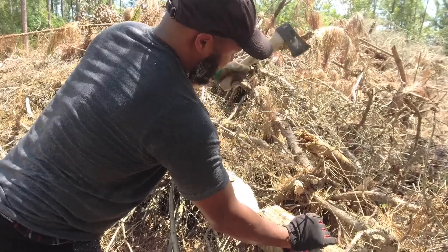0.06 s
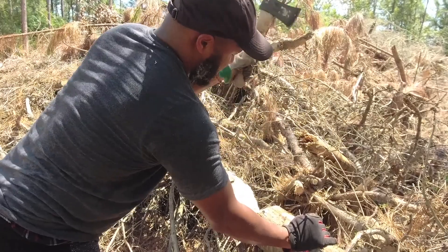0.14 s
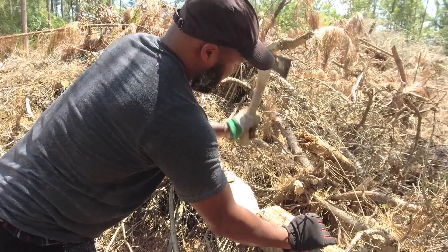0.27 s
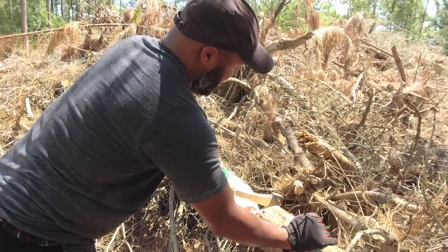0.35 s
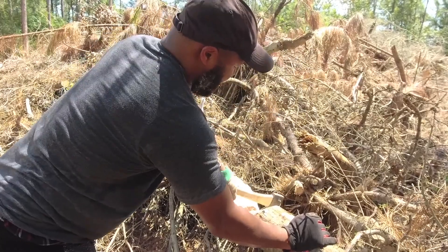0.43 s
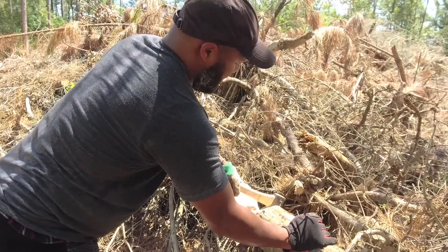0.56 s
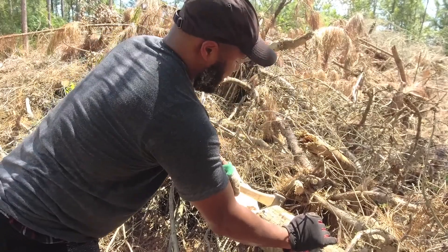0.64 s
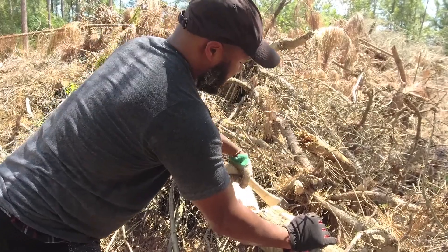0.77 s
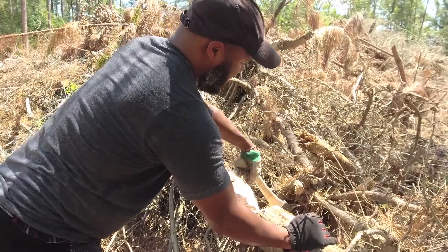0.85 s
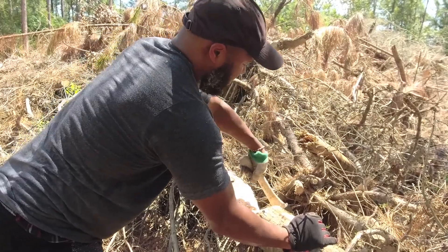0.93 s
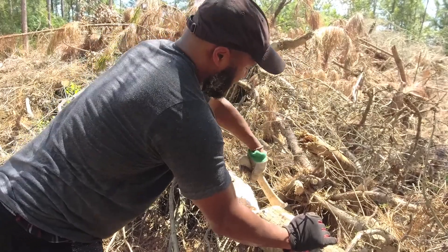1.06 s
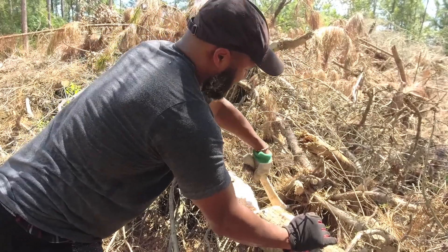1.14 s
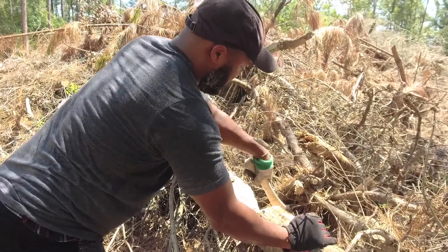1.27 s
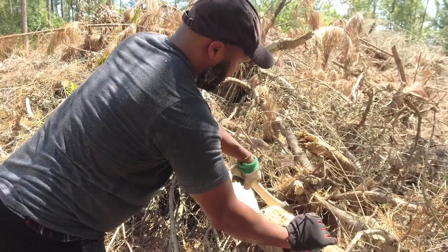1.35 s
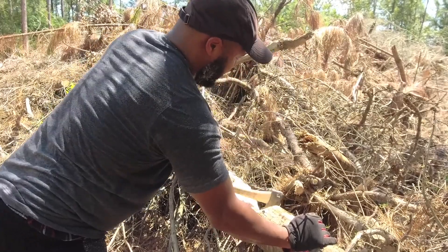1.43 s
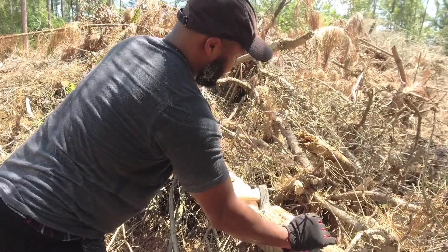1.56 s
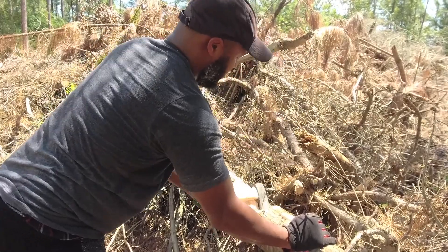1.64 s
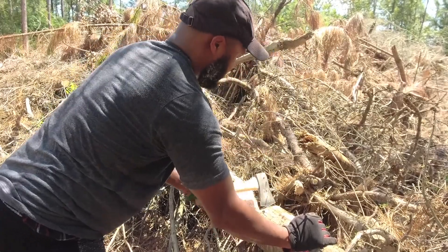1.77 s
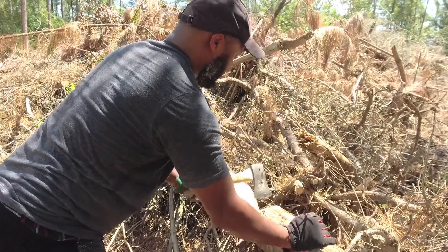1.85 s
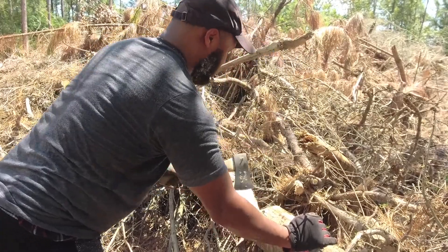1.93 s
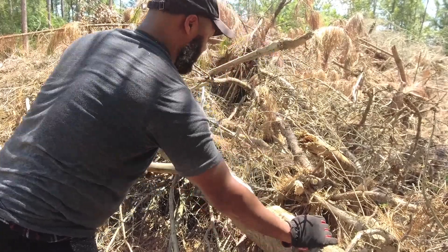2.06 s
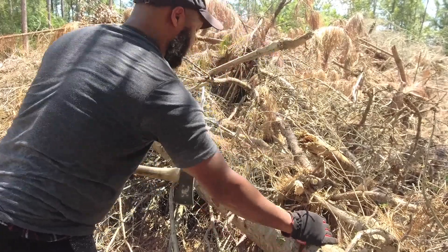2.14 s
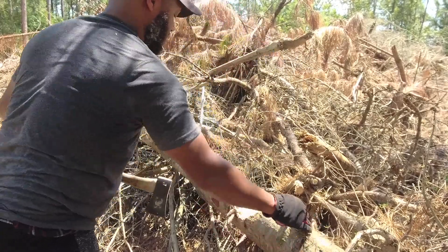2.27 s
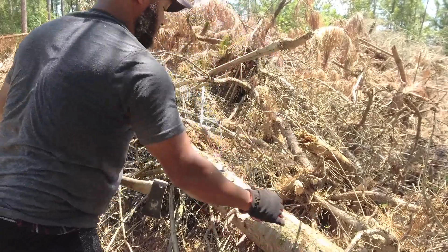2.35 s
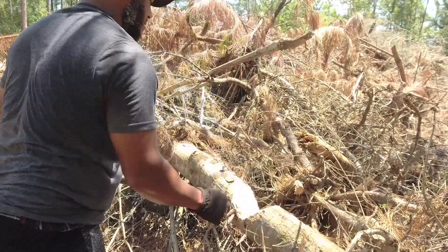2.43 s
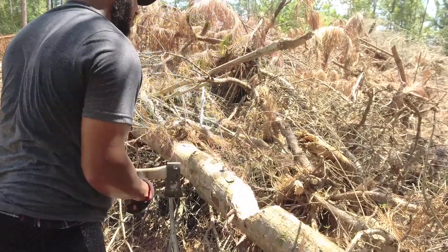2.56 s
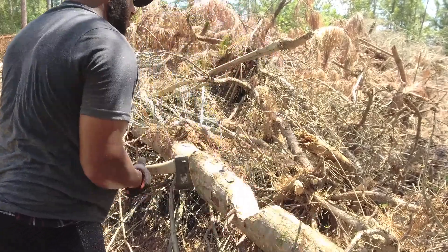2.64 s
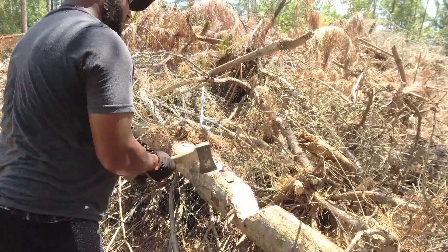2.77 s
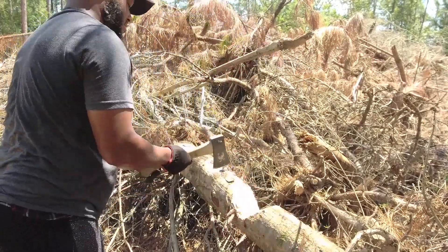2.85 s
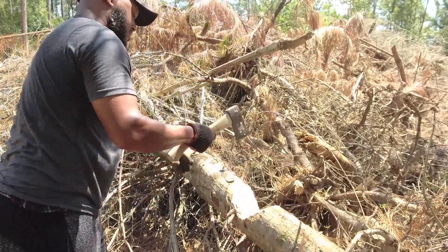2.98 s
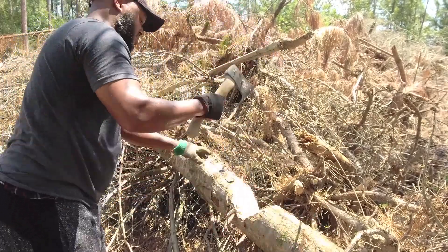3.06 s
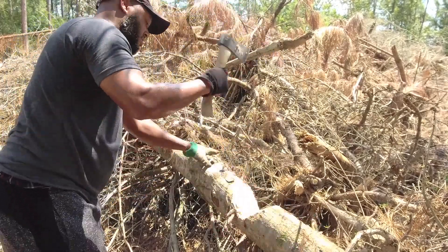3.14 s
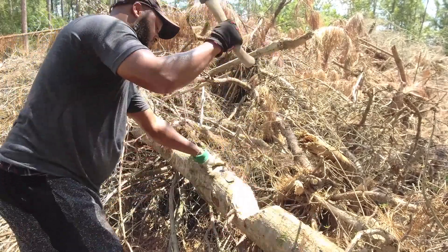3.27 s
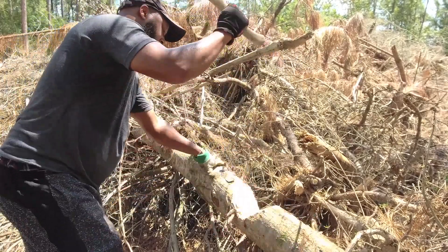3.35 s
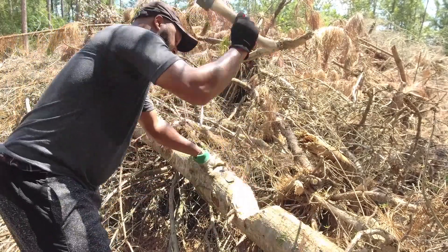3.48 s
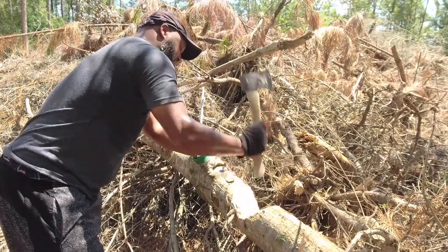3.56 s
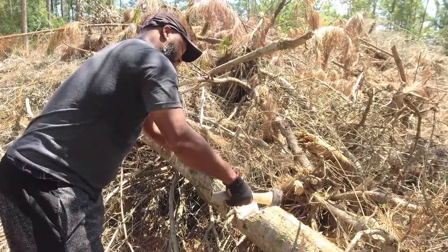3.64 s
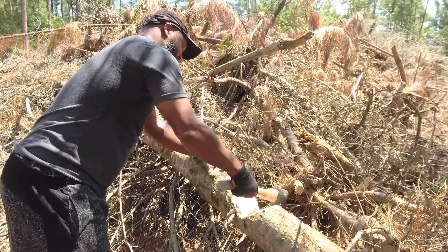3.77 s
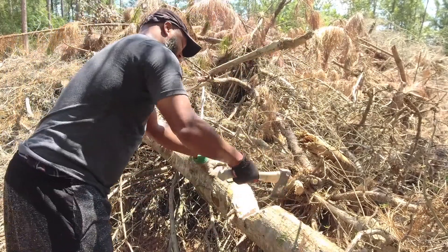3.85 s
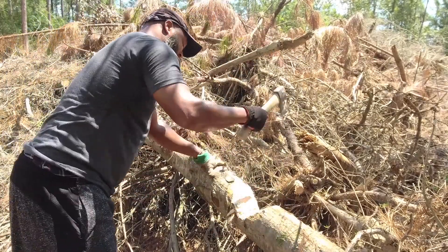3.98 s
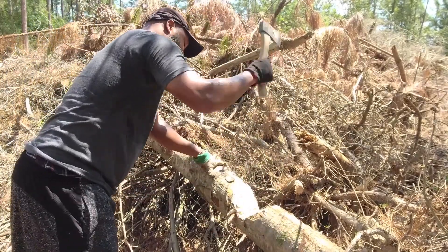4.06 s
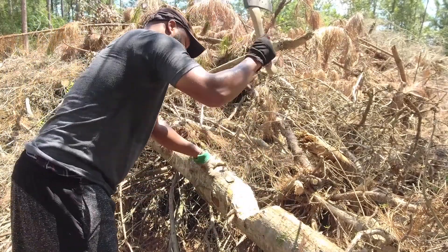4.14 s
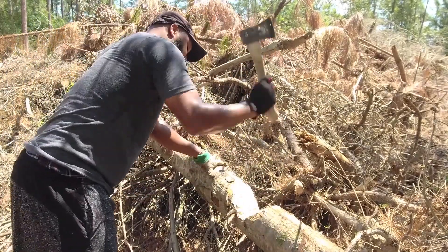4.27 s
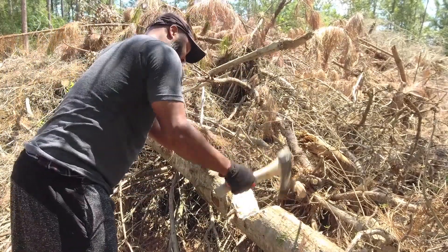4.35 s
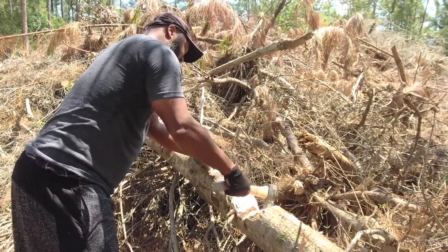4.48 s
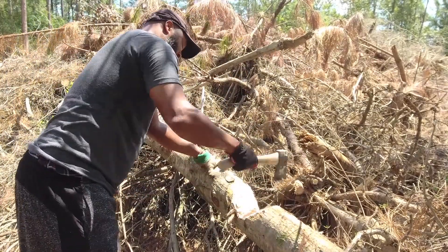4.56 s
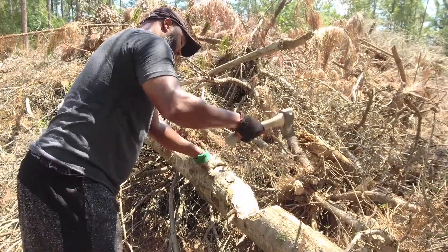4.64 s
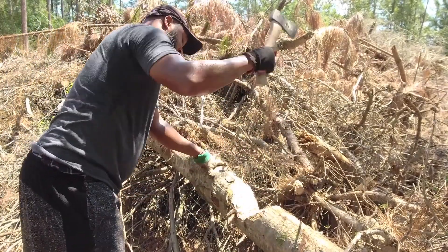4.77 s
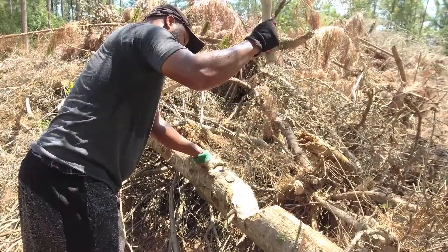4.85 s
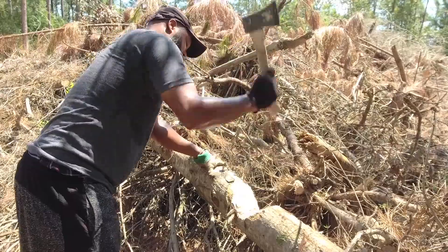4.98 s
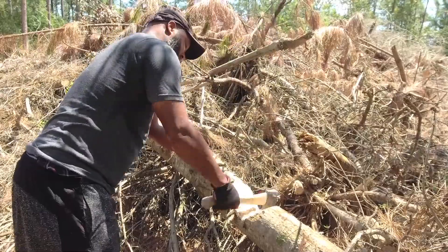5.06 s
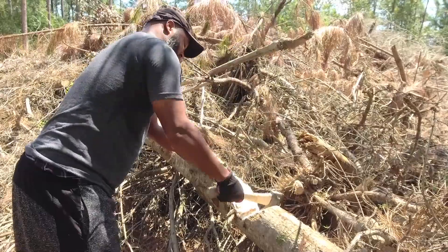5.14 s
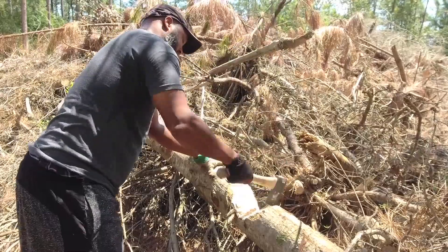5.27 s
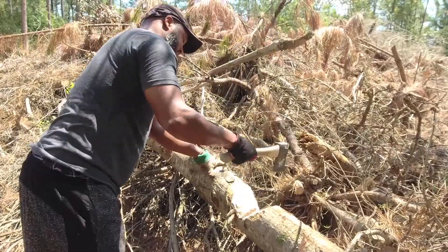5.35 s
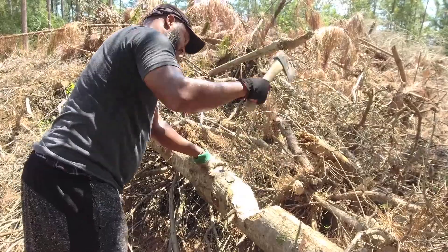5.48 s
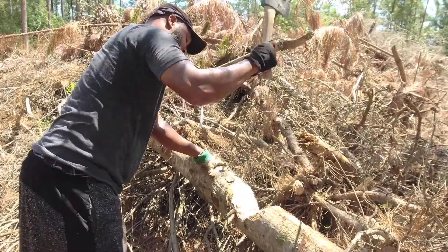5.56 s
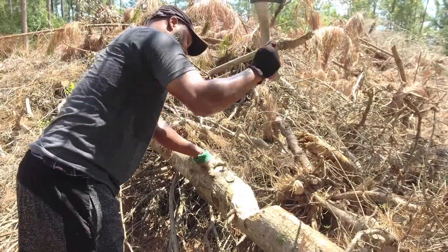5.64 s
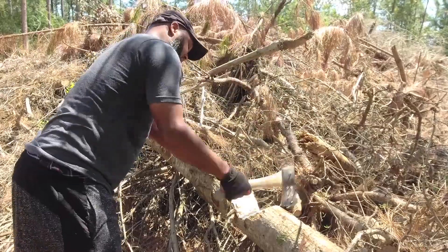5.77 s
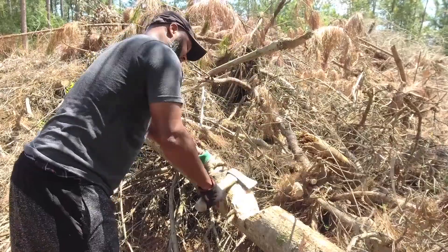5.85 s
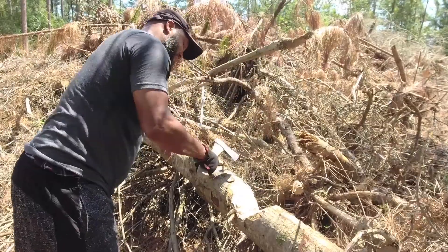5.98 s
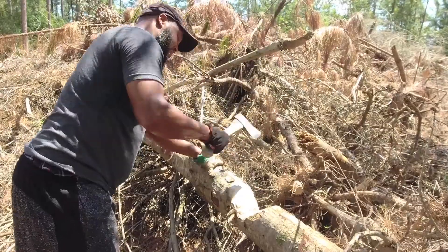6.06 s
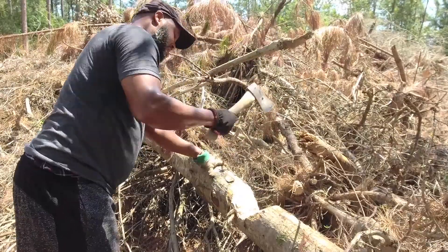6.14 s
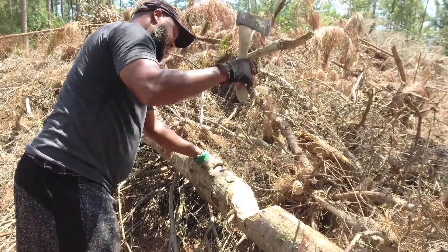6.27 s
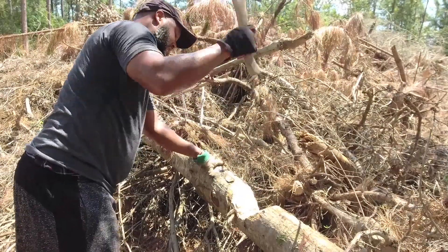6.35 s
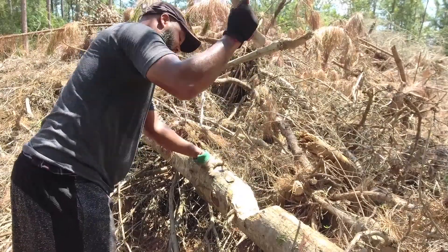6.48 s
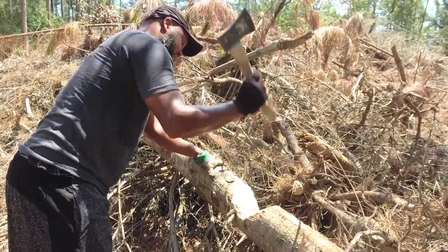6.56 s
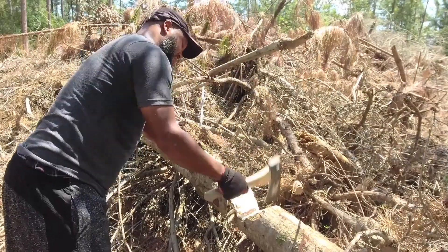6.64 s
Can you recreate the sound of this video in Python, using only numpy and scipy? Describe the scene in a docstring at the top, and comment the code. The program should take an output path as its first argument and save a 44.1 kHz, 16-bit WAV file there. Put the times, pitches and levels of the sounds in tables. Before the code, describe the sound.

Close up outdoors, a hatchet cracks into a dry log, woody and steely, so loud it distorts. The stuck blade creaks loose in tiny ringing slips, cloth chafes softly, then feet crunch dry litter and twigs snap. Five more chops follow at steady intervals, one skidding along the bark. Chips patter down, short echoes return from brush and trees, and cicadas throb faintly to the right over low rumble.

```python
"""Chopping a dry log outdoors

A hatchet chops a dry log beside a pile of brush: bursts of noise and dying tones, cut off at full scale.
The blade sticks and is levered free with quick slips that ring the wood, feet crunch as clumped grains,
then five more swings follow; one skids along the bark with a rub of noise.
Cicadas, a throbbing comb of harmonics with a rasp, swell and fade to the right over a low noise rumble."""
import sys
import numpy as np
from scipy import signal
from scipy.fft import rfft, irfft
from scipy.io import wavfile
from scipy.ndimage import uniform_filter1d

SR = 44100
rng = np.random.default_rng(int(sys.argv[2]) if len(sys.argv) > 2 else 0)


def unload_audio(sound):
    """Save the sound as a 16-bit wav file, at the path given as the first command line argument."""
    columns = np.transpose(np.atleast_2d(sound))
    # keep every value between -1 and 1, then stretch to whole-number steps
    steps = np.round(np.clip(columns, -1, 1) * 32767)
    wavfile.write(sys.argv[1], SR, steps.astype(np.int16))


N = 295911

# All levels are relative: they are combined with other levels further on.
# blade meets wood: start_s, crack_db, low_steel_hz, low_steel_db, high_steel_hz, high_steel_db,
# steel_t60_s (time to fall 60 dB), grit (0-1), clack_db, clack_hz, knock_db, knock_hz,
# log_body_db, log_thud_db, high_log_modes_db
BLOWS = [(0.3516, -8.5, 4735, -3.5, 6050, -0.5, 0.0087, 0.71, -2.5, 950, -18.5, 501.5, -1.5, 6, -18.5),
         (3.6361, -2.5, 3840, -8.5, 6900, -14, 0.011, 0.98, -7.5, 1550, -7, 693, -1.5, 2.5, 0.5),
         (4.3546, -17, 3800, -12.5, 7040, -6.5, 0.033, 0.57, -27.5, 1394, -28.5, 600, -21.5, -19, -19.5),
         (4.3698, -5.5, 4424, 1.5, 5430, -1, 0.0098, 0.77, -2, 1470, -24, 479, -4.5, -3.5, -0.5),
         (5.0507, -27, 3720, -27, 7020, -27.5, 0.06, 0.76, -20, 2340, -43, 700, -28.5, -29.5, -23),
         (5.0647, -5, 4330, -5, 5720, -0.5, 0.012, 0.65, -4, 1600, -15.5, 730, -0.5, -1.5, 0.5),
         (5.7814, -11.5, 4160, -5.5, 6880, -9.5, 0.023, .55, -39, 1560, -30.5, 602, -22, -26.5, -13),
         (5.8451, -30, 2530, -11.5, 3900, -16, 0.012, 0.57, 3.5, 1272, -4.5, 620, 6.5, -23.5, -7),
         (5.877, -40.5, 2446, -33, 4150, -35, 0.018, 0.85, -19, 1356, -24, 604, -13, -36.5, -23.5),
         (6.6685, -12.5, 4524, -1.5, 7450, -7, 0.012, 0.62, -10, 1476, -9.5, 630, 2.5, 7, -10)]
# ringing tones of the log, before each blow shifts them a little: pitch_hz, level_db, t60_s
LOG_MODES = [(107, -34, 0.05), (144, -24.5, 0.06), (239.4, -30.5, 0.087), (323, -26.5, 0.045),
             (470.4, -28, 0.04), (570, -22.5, 0.038), (690, -20, 0.035), (820, -17.5, 0.035),
             (916, -27, 0.019), (1394, -12.5, 0.041), (1720, -19, 0.032), (1806, -15, 0.005),
             (2796, -15.5, 0.033)]
# colour of splitting fibres: pitch_hz, level_db (per Hz)
CRACK_COLOUR = [(100, -13.5), (500, 0.5), (1500, -6), (2300, -2.5), (4000, -4.5), (7000, -3), (10500, -4.5),
                (13000, -17), (16000, -21)]
# the log shudders on its bed of brush: pitch_hz, level_db (per Hz)
BED_COLOUR = [(60, -8), (150, 1.5), (220, -5), (350, -4), (700, -4), (1100, -12), (2500, -30),
              (8000, -60.5)]
# the wedged blade slips in the cut: start_s, length_s, level_db, first_slips_per_s, last_slips_per_s,
# brightness_db (per octave)
CREAKS = [(1.169, 0.1, -42, 118, 48, 14), (1.349, 0.0072, -33.5, 120, 120, 4.5),
          (1.361, 0.044, -41.5, 270, 350, 1), (1.526, 0.047, -55, 130, 150, -10)]
# ringing tones of the wood around the cut, before each slip shifts them: pitch_hz, level_db, t60_s
CUT_MODES = [(828, 7, 0.089), (920, 10.5, 0.081), (1106, 8.5, 0.031), (1475, 9, 0.046), (1680, -3, 0.053),
             (2680, -9, 0.033), (3050, 7, 0.015), (4210, 4, 0.013), (4750, 1, 0.015), (5300, -1, 0.012),
             (6900, -1, 0.016)]
# twigs, chips and taps of the handle: start_s, level_db, centre_hz, t60_s, sharpness_q (no unit)
SNAPS = [(0.306, -43, 7250, 0.12, 2), (0.308, -51, 2420, 0.078, 1.2), (0.721, -58, 5230, 0.2, 5),
         (1.3, -49, 4800, 0.037, 1.1), (1.350, -39.5, 7700, 0.02, 3.9), (1.454, -45, 196, 0.0684, 0.87),
         (1.503, -48, 220, 0.057, 1.04), (2.321, -43.5, 5960, 0.079, 1.1),
         (3.0927, -32.5, 7500, 0.14, 0.58), (3.1675, -32.5, 6500, 0.031, 0.43),
         (3.2486, -25, 5360, 0.056, 0.66), (3.404, -31, 6130, 0.035, 1.4), (3.4296, -25, 8400, 0.035, 1.4),
         (3.438, -25, 7500, 0.013, 0.77), (3.4901, -15, 8500, 0.02, 1.2), (3.51, -16, 5460, 0.0036, 0.56),
         (3.573, -30.5, 5000, .025, .8), (3.72, -30, 8350, 0.0072, 3.2), (3.756, -47, 3870, 0.018, 2.6),
         (3.782, -50, 3850, 0.066, 12), (4.135, -59.5, 2840, 0.025, 10), (4.3305, -34, 7150, 0.066, 1.7),
         (4.332, -45, 3100, 0.062, 3), (4.660, -56, 3780, 0.1, 21), (5.031, -35.5, 6970, 0.16, 1.05),
         (5.1498, -32.5, 6950, 0.019, 0.93), (5.174, -47, 3400, 0.0099, 1.3),
         (5.421, -58, 4020, 0.08, 0.97), (5.7907, -14, 6000, .004, .8), (6.322, -45.5, 8920, 0.11, 1.06)]
# treble roll-off of the twigs and chips: pitch_hz, level_db
SMALL_SOUND_ROLLOFF = [(10500, 0.5), (13000, -4.5), (15000, -20), (16500, -32)]
# a foot presses into dry litter: start_s, length_s, level_db
STEPS = [(3.02, 0.28, -39), (3.196, 0.18, -46.5), (3.337, 0.24, -38.5), (3.416, 0.23, -29.5)]
# weight comes on, the litter settles, the foot rests
STEP_ATTACK_S, STEP_RELEASE_S, SETTLE_DB_PER_S = .09, 0.024, 72.5
# blade and glove sliding on bark: start_s, length_s, level_db
RUBS = [(0.315, 0.12, -46), (1.102, 0.29, -68), (2.104, 0.33, -59), (2.982, 0.22, -54),
        (4.342, 0.024, -46.5), (5.041, 0.03, -49.5), (5.768, 0.089, -24.5), (5.813, 0.1, -35),
        (5.817, 0.21, -45)]
# colour of dry litter and bark: pitch_hz, level_db (per Hz)
DRY_COLOUR = [(100, -15), (300, -9.5), (520, -3.5), (900, -11.5), (1800, -3), (3500, -1), (6500, 1),
              (10000, -4), (12500, -9), (15000, -40)]
# the sole scrapes over the ground: start_s, length_s, level_db, centre_hz
SCUFFS = [(3.081, 0.17, -59, 500), (3.198, 0.24, -63.5, 480), (3.432, 0.21, -51.5, 510)]
# glove and sleeve chafe as the grip shifts and the arm swings: start_s, length_s, level_db, first_hz, last_hz
CHAFES = [(1.09, 0.17, -63.5, 4880, 4600), (1.119, 0.15, -63, 2520, 2620), (1.139, 0.12, -64, 1720, 1835),
          (2.112, 0.097, -68, 2580, 2510), (2.159, 0.22, -60, 2926, 2568), (2.621, 0.1, -71.5, 2490, 2500),
          (2.805, 0.13, -56, 2500, 2660), (2.931, 0.33, -63.5, 2574, 2934), (4.271, 0.061, -66, 2760, 2820),
          (4.951, 0.11, -70.5, 2945, 2820)]
# decay of the brush pile: pitch_hz, t60_s
BRUSH_DECAY = [(100, 0.16), (700, 0.12), (2000, 0.078), (6000, 0.17), (11000, 0.18), (15000, 0.039)]
# the echoes are wider in the treble: pitch_hz, side_db
ECHO_WIDTH = [(150, -15), (700, -12.5), (2000, -4), (12000, -2)]
# decay of the trees beyond: pitch_hz, t60_s
TREE_DECAY = [(100, 0.28), (700, 0.78), (2500, 0.13), (6000, 0.19), (11000, 0.25), (15000, 0.08)]
# loudness of the odd and of the even cicada harmonics: time_s, odd_db, even_db
SONG = [(0, -88, -101.6), (0.8, -71, -100), (1.8, -62, -79), (2.9, -57.5, -63), (3.5, -58.5, -72),
        (4.1, -73.5, -63), (4.7, -79, -68.5), (5.6, -71, -66.5), (6.7, -80.5, -71.5)]
# the throb slows while the pitch drifts, in the end upward: time_s, pitch_hz, throbs_per_s
DRIFT = [(1, 258.2, 98), (2.7, 257.7, 97), (4.1, 258.06, 91.5), (5, 258.4, 88), (5.5, 258.85, 84.5),
         (6.7, 260.3, 75)]
HARMONICS = range(16, 49)  # multiples of the song's pitch
# the throb flanks each harmonic, from three sidebands below to three above: odd_db, even_db
SIDEBANDS = [(-17.5, -19.5), (-11, -12), (-6, -7.5), (1, 1.5), (-5, -1), (-9, -9), (-18, -15)]
# resonances that shape the odd harmonics: pitch_hz, level_db
ODD_COLOUR = [(4380, -28.5), (4900, -21.5), (5410, -8.5), (5930, -26.5), (6450, -6.5), (6960, -7.5),
              (7470, -8.5), (7950, -5), (9020, 0), (9540, -15.5), (10050, -33.5), (12400, -40)]
# resonances that shape the even harmonics: pitch_hz, level_db
EVEN_COLOUR = [(4120, -14.5), (4640, -16), (5150, -27.5), (5670, -9), (6700, 0), (7730, -5), (9280, 0.5),
               (9800, -12.5), (10300, -20), (11800, -21.5), (12400, -26.5)]
# single harmonics swell or sink for a while: middle_s, half_length_s, pitch_hz, level_db
SWELLS = [(0.11, 1, 13000, 14.5), (0.66, 1, 9030, -14.5), (1.7, 0.71, 3400, -15.5), (2.9, 0.47, 4650, 8),
          (3.1, 0.45, 6800, -13.5), (5.65, 0.18, 2100, 4.5), (7.3, .25, 2800, -14.5), (6.55, .45, 4650, 14),
          (3.5, 1, 6000, -12.5), (5.6, 0.6, 6800, -10.5), (2.9, 0.72, 6300, 6.5), (5.4, 0.76, 4300, 4.5),
          (1.6, 0.44, 6700, 4.5), (2.5, .6, 9020, 3)]
SWELL_WIDTH_HZ, FLUTTERS_PER_S = 150, 6
# below this pitch, harmonics get purer: their sidebands get weaker
PURE_BELOW_HZ, PURER_DB_PER_KHZ = 7500, 0.67
# colour of the rasp under the song: pitch_hz, level_db (per Hz)
RASP_COLOUR = [(3000, -41), (4300, -20), (5900, -18), (6600, -2), (7600, -9), (9100, -5), (9650, -5.5),
               (10200, -18), (12000, -21), (13500, -43)]
# strength of the rasp: time_s, level_db
RASP_LEVEL = [(0, -79), (.7, -66.5), (1.6, -69), (2.6, -49.5), (3.4, -40.5), (3.9, -63.5), (4.7, -57.5),
              (5.6, -54.5), (6.7, -55)]
# colour of the outdoor background: pitch_hz, level_db (per Hz)
AIR_COLOUR = [(20, -18), (45, -8.5), (78, 4.5), (110, -7.5), (160, -6.5), (250, -19), (600, -23.5),
              (1100, -34.5), (2500, -38), (6000, -35), (12000, -48), (15000, -64.5)]
# strength of the background: time_s, level_db
AIR_LEVEL = [(0.0, -58), (0.24, -59), (1.96, -60), (3.6, -55.5), (3.92, -62.5), (4.57, -64.5), (6.29, -64),
             (6.7, -59.5)]
EDGE_HZ = 16200  # top of the band that is kept


def amp(db):
    """Turns decibels into a gain."""
    return 10 ** (np.asarray(db) / 20)


def unit(x):
    """Scales a sound to an average (rms) strength of 1."""
    return x / np.sqrt(np.mean(x ** 2) + 1e-20)


def read(points, hz):
    """Reads a table by pitch, with equal steps for equal pitch ratios."""
    f, value = np.transpose(points)
    return np.interp(np.log(hz + 1), np.log(f + 1), value)


def curve(rows):
    """Reads every column of a time table at each sample."""
    s, *columns = np.transpose(rows)
    return [np.interp(np.arange(N) / SR, s, column) for column in columns]


def add(mix, s, sound):
    """Mixes a sound in at time s."""
    part = mix[max(round(s * SR), 0):][:len(sound)]
    part += sound[:len(part)]


def shape(x, spectrum):
    """Filters x by a gain curve."""
    size = x.shape[-1]
    gain = amp(read(spectrum, np.fft.rfftfreq(size, 1 / SR)))
    return irfft(rfft(x) * gain, size)


def colour(x, spectrum):
    """Filters x by a gain curve, then scales it to rms 1."""
    return unit(shape(x, spectrum))


def band(size, hz, q):
    """Makes noise around one pitch; a higher q gives a narrower band."""
    f = np.fft.rfftfreq(size, 1 / SR) + 1
    resonance = 1 + (q * (f / hz - hz / f)) ** 2
    return unit(irfft(rfft(rng.standard_normal(size)) / resonance, size))


def wander(rate):
    """Draws a random line that takes a new direction rate times a second."""
    knots = rng.standard_normal(4096)
    return np.interp(np.arange(N) / SR * rate, np.arange(len(knots)), knots)


def ring(modes, t):
    """Adds up struck tones that die away."""
    return sum(amp(db - 60 * t / t60) * np.sin(2 * np.pi * hz * t) for hz, db, t60 in modes)


def chops(crack_t60=0.028, clack_t60=.015, knock_t60=0.039, knock_rise=.0016, steel_q=8,
          rise=0.00032, hold=0.00081, spot_db=3.7, bed_db=-27, bed_wait=.008, bed_t60=0.092, lowest_hz=96):
    """Each blow cracks fibres, rings the steel, clacks in the cut and knocks the log, which shudders on its bed."""
    spot_detune = .03  # share of the pitch
    out, t = np.zeros(N), np.arange(SR // 3) / SR
    late = np.maximum(t - hold, 0)  # the edge keeps driving in for a moment
    for (s, crack_db, low_hz, low_db, high_hz, high_db, steel_t60, grit, clack_db, clack_hz,
         knock_db, knock_hz, body_db, thud_db, split_db) in BLOWS:
        crack = colour(rng.standard_normal(len(t)), CRACK_COLOUR) * amp(crack_db - 60 * late / crack_t60)
        # wood grinding on the cheeks of the blade roughens its ring
        steel = np.zeros(len(t))
        for hz, db in ((low_hz, low_db), (high_hz, high_db)):
            clean = (1 - grit) * np.sin(2 * np.pi * hz * t)
            rough = grit * band(len(t), hz, steel_q)
            steel += amp(db - 60 * late / steel_t60) * (clean + rough)
        clack = ring([(clack_hz, clack_db, clack_t60)], t)
        # the hollow knock builds as the wood stops the blade
        build = 1 - np.exp(-t / knock_rise)
        knock = ring([(knock_hz, knock_db, knock_t60)], t) * build
        # splitting fibres wake the high modes; every blow lands on another spot
        force = [(170, thud_db), (550, body_db), (1000, body_db), (1500, split_db)]
        modes = []
        for hz, db, decay in LOG_MODES:
            spot_hz = hz * (1 + spot_detune * rng.standard_normal())
            modes.append((spot_hz, db + read(force, hz) + spot_db * rng.standard_normal(), decay))
        log = ring(modes, t)
        add(out, s, (crack + steel + clack - knock - log) * (1 - np.exp(-t / rise)))
        shudder = colour(rng.standard_normal(len(t)), BED_COLOUR) * build
        add(out, s + bed_wait, shudder * amp(bed_db + (body_db + thud_db) / 2 - 60 * t / bed_t60))
    # the blows carry no deep bass: a high-pass removes everything below lowest_hz
    return signal.sosfilt(signal.butter(4, lowest_hz, "high", fs=SR, output="sos"), out)


def creaks(jitter=0.25, detune=0.035, uneven_db=1.8, fade_db=-5, lowest_hz=700):
    """The blade sticks and slips; each slip rings another spot in the wood around the cut."""
    out, t = np.zeros(N), np.arange(SR // 16) / SR
    for s, length, db, first_rate, last_rate, bright_db in CREAKS:
        at = 0  # seconds into the creak
        for gap, chance, *spots in rng.standard_normal((30, 2 + len(CUT_MODES))):
            if at >= length:
                break
            modes = []
            for (hz, mode_db, t60), spot in zip(CUT_MODES, spots):
                octaves = np.log2(hz / CUT_MODES[0][0])
                modes.append((hz * (1 + detune * spot), mode_db + bright_db * octaves, t60))
            body = ring(modes, t)
            level = amp(db + fade_db * at / length + uneven_db * chance)
            add(out, s + at, level * body / abs(body).max() * 2)
            slips_per_s = np.interp(at, [0, length], [first_rate, last_rate])
            at += np.clip(1 + jitter * gap, .2, 2) / slips_per_s
    return signal.sosfilt(signal.butter(4, lowest_hz, "high", fs=SR, output="sos"), out)


def chips(count=48, chip_db=-47, tick_t60=0.1, late_db=-16):
    """After each blow with a strong clack, chips land in the litter, the later ones more softly."""
    first_s, spread_s = .05, .24
    out, t = np.zeros(N), np.arange(3072) / SR
    for s in [blow[0] for blow in BLOWS if blow[8] > -10]:  # column 8 is clack_db
        for wait, size, pitch in rng.random((count, 3)):
            level = amp(chip_db - 10 * size + late_db * wait - 60 * t / tick_t60)
            tick = band(len(t), 1500 * 5 ** pitch, 0.081) * level
            add(out, s + first_s + spread_s * wait, tick)
    return out


def snaps():
    """Breaking twigs, falling chips and the handle give short bursts of noise around one pitch."""
    out, t = np.zeros(N), np.arange(SR // 6) / SR
    for s, db, hz, t60, q in SNAPS:
        add(out, s, band(len(t), hz, q) * amp(db - 60 * t / t60))
    return out


def rustle(grains_per_s=1700, spread_db=2.0, smooth=0.361, clump_db=3.5, swell_db=1.5, rub_smooth=0.87):
    """Litter breaks in clumps of tiny fractures under each step; bark and cloth rub more smoothly."""
    sizes = amp(spread_db * np.minimum(rng.exponential(1, N), 4)) * rng.choice([-1, 1], N)
    grains = unit(sizes * (rng.random(N) < grains_per_s / SR))
    hiss = rng.standard_normal(N)
    weight, sliding = np.zeros(N), np.zeros(N)
    for s, length, db in STEPS:
        t = np.arange(int(length * SR)) / SR
        press = np.minimum(t / STEP_ATTACK_S, 1) ** 2.5 * np.minimum((length - t) / STEP_RELEASE_S, 1)
        add(weight, s, press * amp(db - SETTLE_DB_PER_S * np.maximum(t - STEP_ATTACK_S, 0)))
    for s, length, db in RUBS:
        add(sliding, s, amp(db) * signal.windows.tukey(int(length * SR), .7))
    clumps = amp(clump_db * np.tanh(wander(160)) + swell_db * wander(35))
    crunch = weight * clumps * colour(grains + smooth * hiss, DRY_COLOUR)
    return crunch + sliding * colour(grains + rub_smooth * hiss, DRY_COLOUR)


def scuffs(q=3.0, catch_db=3):
    """A sole drags with a low, uneven scrape of noise around one pitch."""
    out = np.zeros(N)
    for s, length, db, hz in SCUFFS:
        size = int(length * SR)
        add(out, s, amp(db) * band(size, hz, q) * signal.windows.tukey(size, .5))
    return out * amp(catch_db * wander(90))


def chafes(q=7, catch_db=4, brush_db=-5):
    """Fabric slides with a soft, uneven squeak that glides in pitch, over a wider brushing."""
    brush_q = 1.6
    out = np.zeros(N)
    for s, length, db, first_hz, last_hz in CHAFES:
        size = int(length * SR)
        glide = np.exp(2j * np.pi * np.cumsum(np.linspace(0, last_hz - first_hz, size)) / SR)
        squeak = (signal.hilbert(band(size, first_hz, q)) * glide).real
        brushing = amp(brush_db) * band(size, first_hz, brush_q)
        add(out, s, amp(db) * (squeak + brushing) * signal.windows.tukey(size, .7))
    return out * amp(catch_db * wander(160))


def ports(x, right_db, apart, case_db=-14):
    """Two close microphones differ in level and by a delay of apart samples; the case echoes more treble."""
    case_lag_s = .0008
    f = np.fft.rfftfreq(N, 1 / SR)
    turn = np.exp(1j * np.pi * apart * f / SR)
    case = amp(case_db) * (f / 8000) ** 0.99 * np.exp(-2j * np.pi * f * case_lag_s)
    left, right = turn * amp(-right_db / 2) + case, amp(right_db / 2) / turn - case
    return irfft(rfft(x) * np.array([left, right]), N)


def scatter(x, decay, delay, tone):
    """Brush returns sparse echoes, each band of pitch dying at its own speed."""
    taps = rng.choice([-1., 1.], (2, SR)) * (rng.random((2, SR)) < 4000 / SR)
    hz, t, z = signal.stft(taps, SR, nperseg=256)
    fade = amp(read(tone, hz)[:, None] - 60 * t / read(decay, hz)[:, None])
    mid, side = signal.istft(z * fade, SR, nperseg=256)[1]
    side = shape(side, ECHO_WIDTH)
    tail = (mid + np.array([side, -side])) / np.linalg.norm(mid)
    tail = np.pad(tail, ((0, 0), (int(delay * SR), 0)))
    return signal.fftconvolve(x[None], tail, axes=1)[:, :N]


def forest(x, side_db=-6):
    """Countless far trunks return the sound as a diffuse hush, each band dying at its own speed."""
    hz, t, z = signal.stft(x, SR, nperseg=256)
    early = t[:400]
    fade = amp(-60 * early / read(TREE_DECAY, hz)[:, None]) ** 2 * (1 - np.exp(-early / .02))
    # smear the power over neighbouring pitches, then over time
    power = uniform_filter1d(abs(z) ** 2, size=5, axis=0)
    power = signal.fftconvolve(power, fade / fade.sum(1, keepdims=True), axes=1)
    hush = np.sqrt(abs(power[:, :len(t)])) * np.exp(2j * np.pi * rng.random((2, *z.shape)))
    mid, side = signal.istft(hush, SR, nperseg=256)[1][:, :N]
    return mid + amp(side_db) * np.array([side, -side])


def cicadas(lines_db=3.0, rasp_db=-4, waver_hz=0.035, flutter_db=2.5, pulsing=0.19):
    """A throbbing comb of harmonics, each fluttering by itself, over a rasp that pulses twice in each cycle."""
    hop = 147  # samples between level updates
    t = np.arange(0, N, hop) / SR
    odd, even = (db[::hop] for db in curve(SONG))
    pitch_hz, throb_hz = curve(DRIFT)
    cycle = np.cumsum(pitch_hz + waver_hz * wander(27)) / SR
    throb = np.cumsum(throb_hz) / SR
    side = np.arange(len(SIDEBANDS)) - len(SIDEBANDS) // 2
    flanks = np.exp(2j * np.pi * side[:, None] * throb).astype(np.complex64)
    turn, carrier = np.exp(2j * np.pi * cycle), np.exp(2j * np.pi * HARMONICS[0] * cycle)
    odd_flank_db, even_flank_db = np.transpose(SIDEBANDS)
    buzz = np.zeros(N)
    for k in HARMONICS:
        hz = k * pitch_hz[0]
        if k % 2:
            song_db, tone, flank_db = odd, ODD_COLOUR, odd_flank_db
        else:
            song_db, tone, flank_db = even, EVEN_COLOUR, even_flank_db
        swell_db = sum(db * np.exp(-((t - s) / half) ** 2 - ((hz - at_hz) / SWELL_WIDTH_HZ) ** 2)
                       for s, half, at_hz, db in SWELLS)
        flutter = flutter_db * wander(FLUTTERS_PER_S)[::hop]
        level = np.repeat(amp(song_db + swell_db + flutter), hop)[:N]
        below_khz = max(PURE_BELOW_HZ - hz, 0) / 1000
        db = read(tone, hz) + flank_db - abs(side) * PURER_DB_PER_KHZ * below_khz
        starts = np.exp(2j * np.pi * rng.random(len(side)))  # random starting phases
        cluster = (amp(db) * starts).astype(np.complex64) @ flanks
        buzz += level * (cluster * carrier).imag
        carrier = carrier * turn  # step up to the next harmonic
    rasp = colour(rng.standard_normal(N), RASP_COLOUR) * (1 + pulsing * (turn * turn).imag)
    return amp(lines_db) * np.sqrt(2) * buzz + amp(rasp_db + curve(RASP_LEVEL)[0]) * rasp


def air(level_db=2.0, side_db=-24):
    """Low outdoor rumble: coloured noise, nearly alike on both sides."""
    mid, side = colour(rng.standard_normal((2, N)), AIR_COLOUR)
    stereo = mid + amp(side_db) * np.array([side, -side])
    return stereo * amp(level_db + curve(AIR_LEVEL)[0] + wander(4.4))


def scene():
    """Joins the work close by, its echoes from brush and trees, the insects and the air."""
    loose_bits = shape(chips() + snaps(), SMALL_SOUND_ROLLOFF)
    work = chops() + loose_bits + rustle() + scuffs() + chafes() + creaks()
    brush_tone = [(150, 2.5), (1000, -2.0), (6000, -10.0), (11000, -0.5), (15000, -3)]  # pitch_hz, level_db
    near = scatter(work, BRUSH_DECAY, delay=.005, tone=brush_tone)
    direct = ports(work, right_db=1.0, apart=0, case_db=-12.5)
    insects = ports(cicadas(), right_db=5, apart=.4, case_db=-11)
    return direct + amp(-14.5) * near + amp(-31.0) * forest(work) + insects + air()


def record(dry):
    """Overload cuts off peaks at full scale; then a filter removes the highest treble."""
    clipped = np.clip(dry, -1, 1)
    low_pass = signal.firwin(255, EDGE_HZ, window=("kaiser", 8), fs=SR)
    return signal.oaconvolve(clipped, low_pass[None], "same")


dry = scene()
out = record(dry)
unload_audio(out)
```